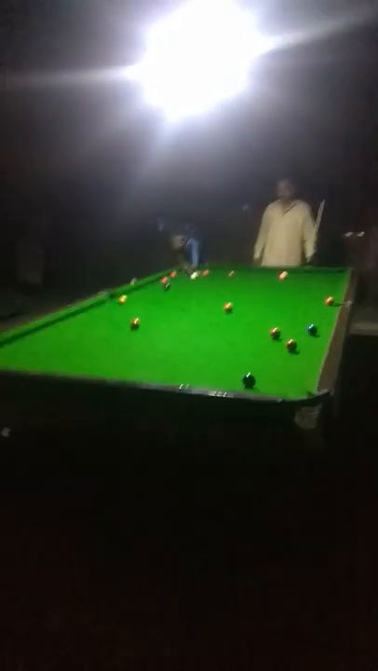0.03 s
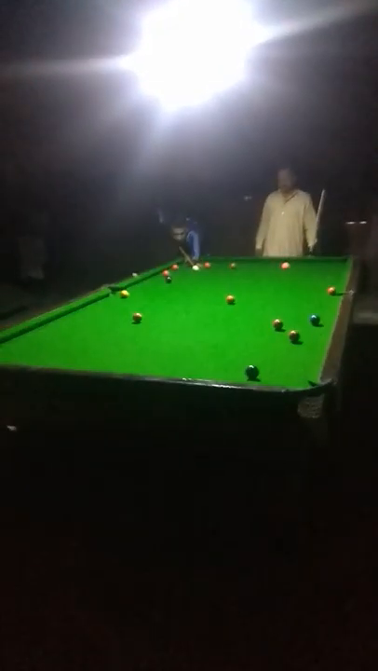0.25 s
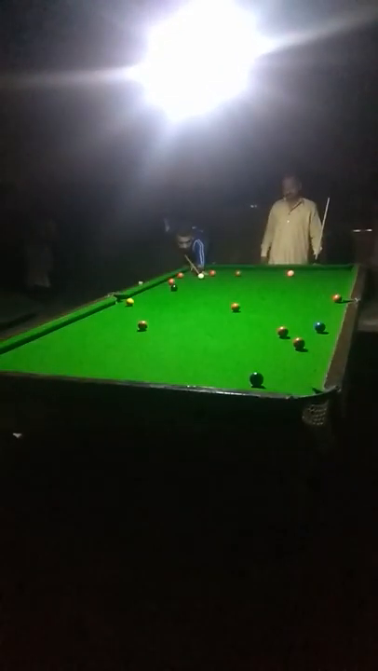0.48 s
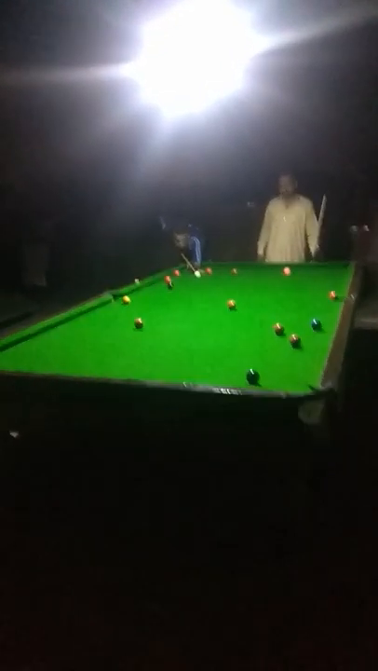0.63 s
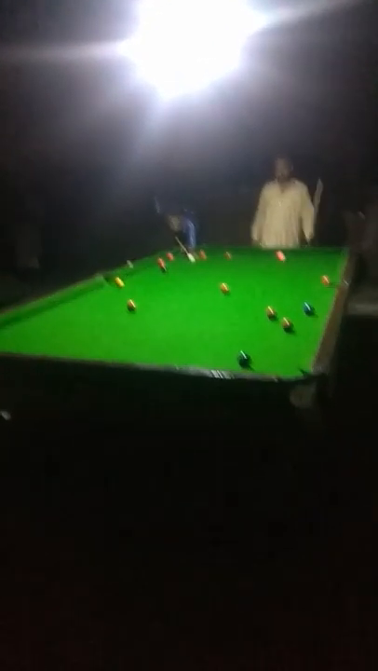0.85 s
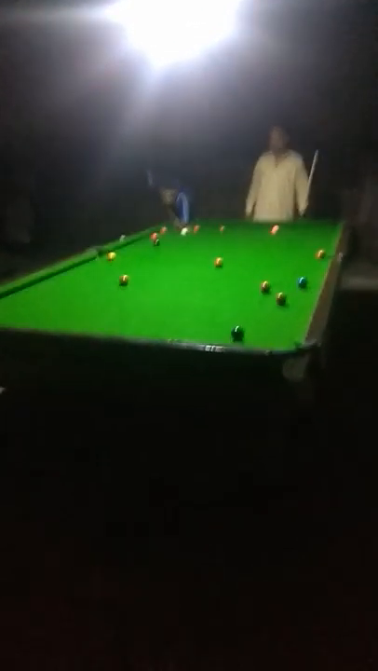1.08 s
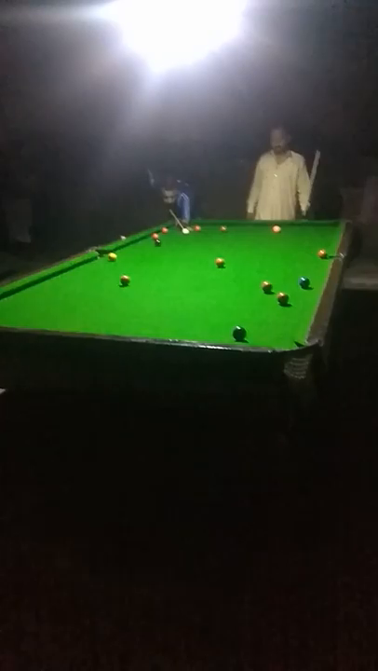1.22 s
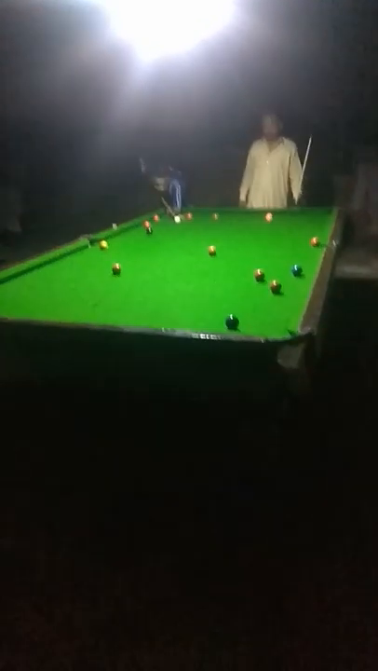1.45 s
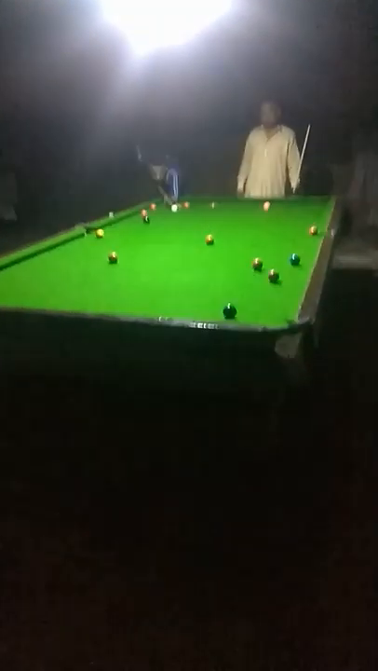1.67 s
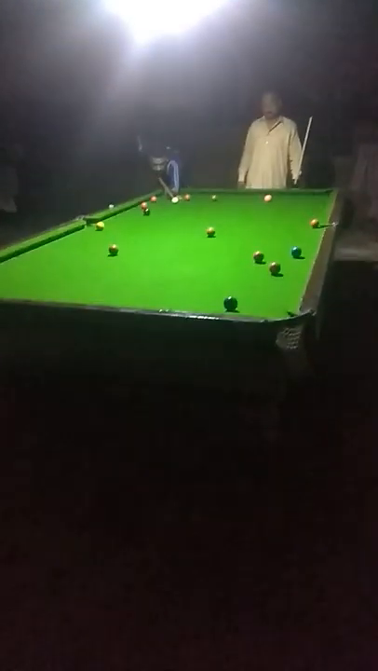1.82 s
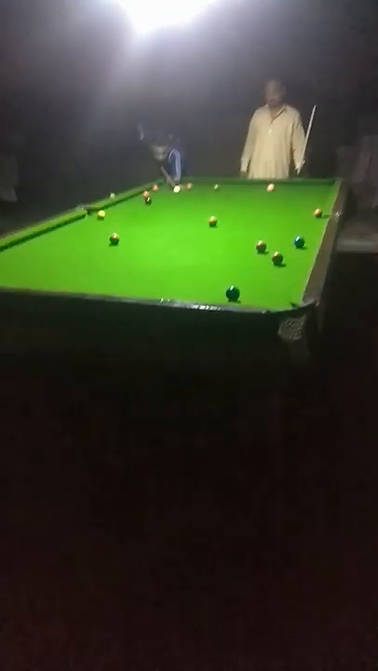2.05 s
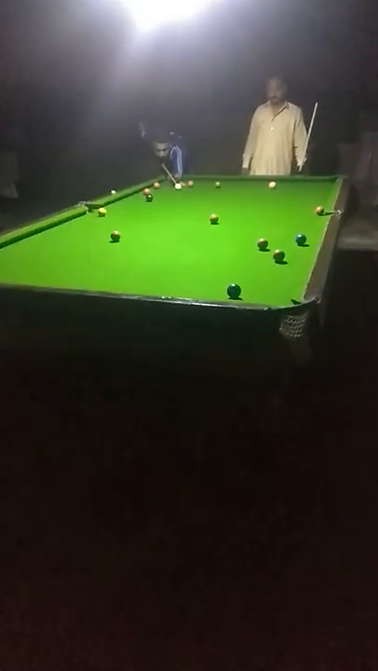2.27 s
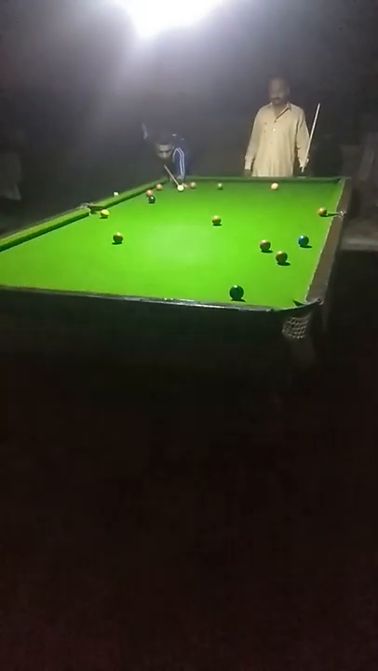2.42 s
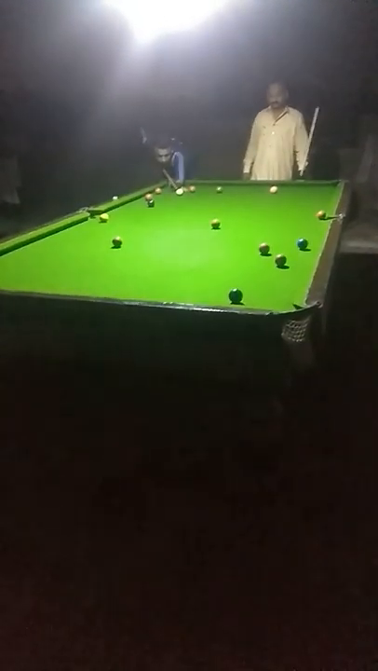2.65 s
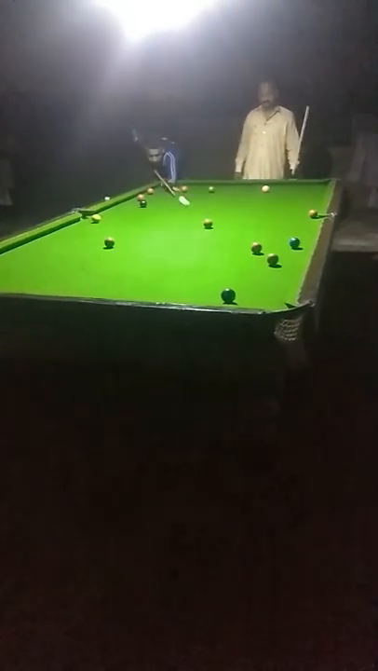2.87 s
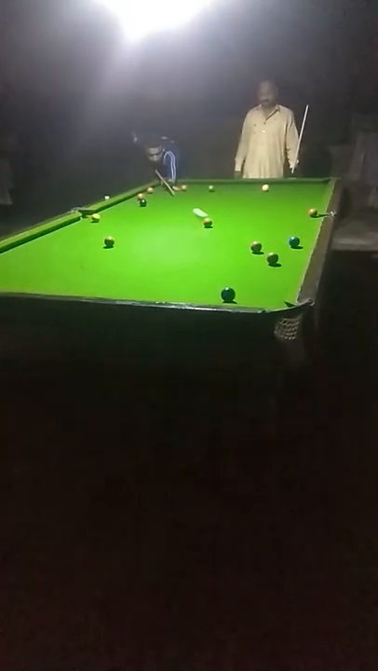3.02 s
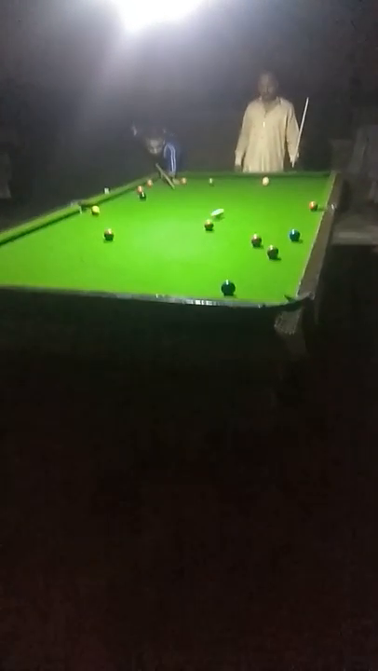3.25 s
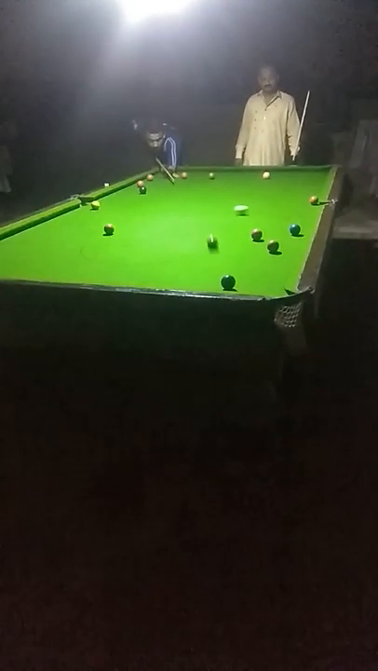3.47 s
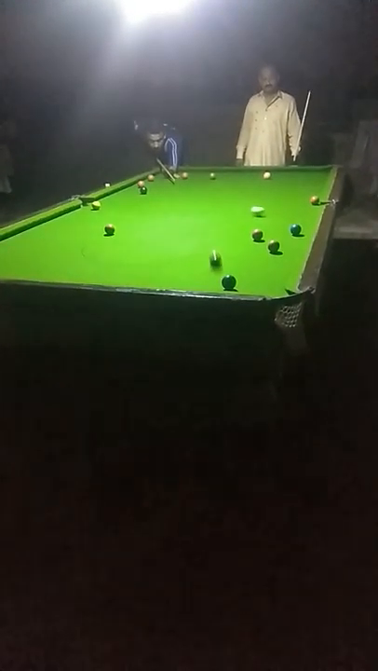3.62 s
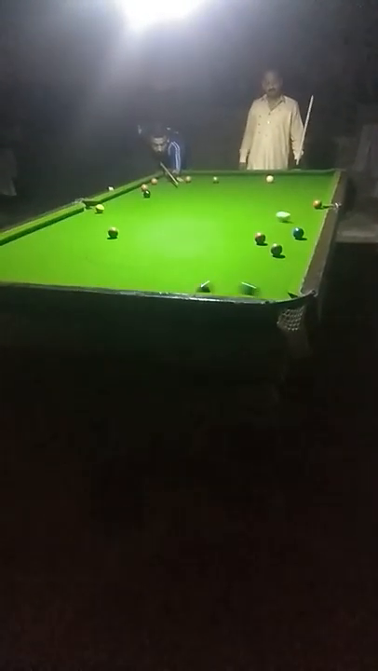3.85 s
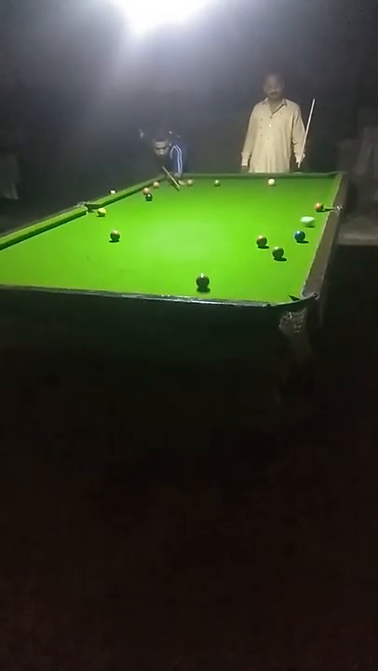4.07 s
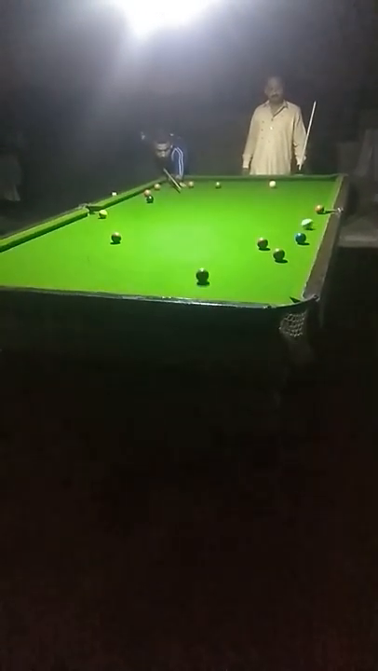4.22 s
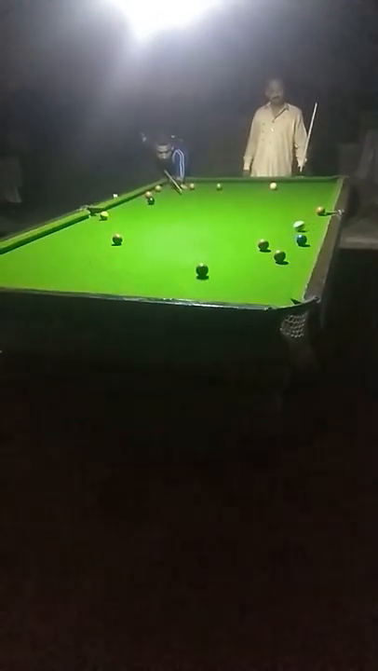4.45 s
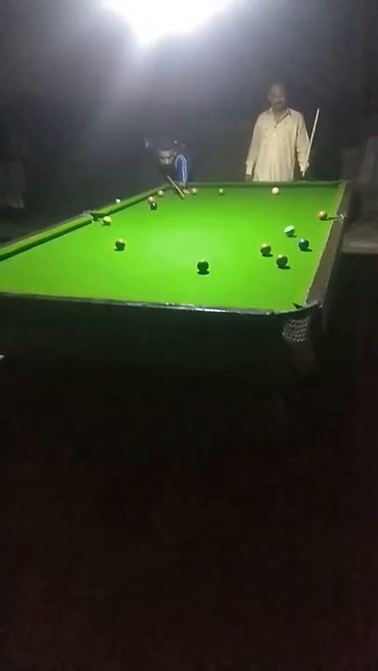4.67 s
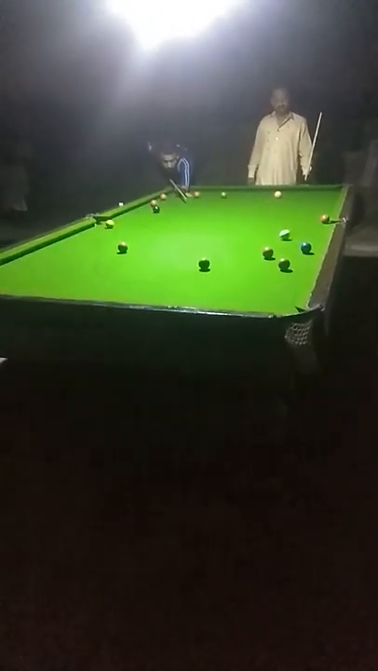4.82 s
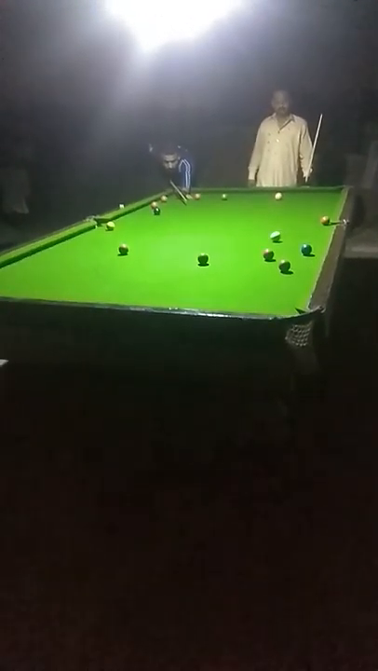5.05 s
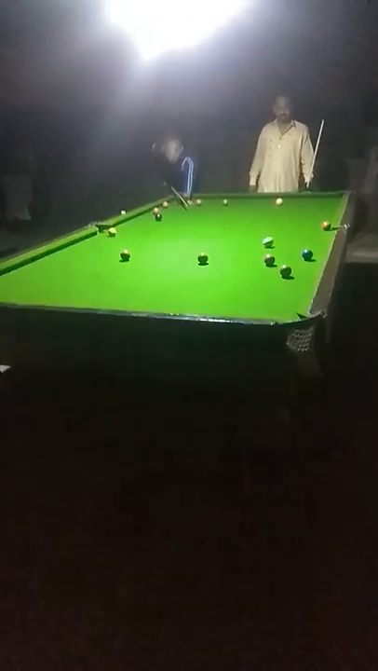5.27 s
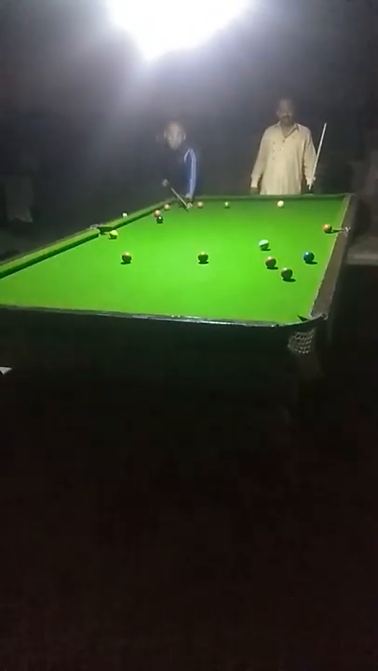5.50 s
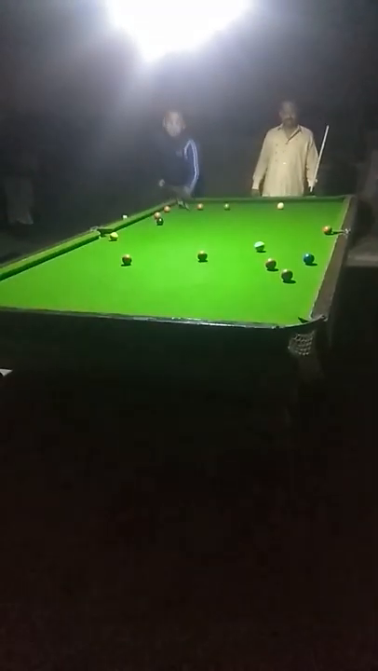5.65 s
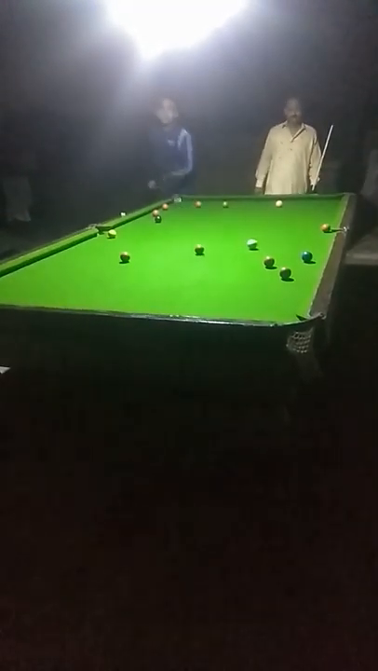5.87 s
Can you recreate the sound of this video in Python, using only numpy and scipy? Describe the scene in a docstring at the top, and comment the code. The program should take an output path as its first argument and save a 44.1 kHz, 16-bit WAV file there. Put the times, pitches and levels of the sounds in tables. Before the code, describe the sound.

Snooker under a hard roof, heard by a hand-held phone some way from the table. Near-silence with a brief shoe scrape, then a duller cue strike and sharp ball collisions, the first loudest, with snappy echoes and a short diffuse tail. A gritty foot drag crackles close on the left between later clacks; a cushion-like thump and faint cloth rustle end it.

```python
"""Snooker table at night

Under a hard roof, on a hand-held phone with two microphone ports: a cue strikes and balls clack four times, as
short pushes of air with sharp echoes and noise tails. Thuds and hollow knocks are clusters of decaying modes.
Close by on the left a shoe scuffs and clothes rustle, as strokes of shaped noise with snaps of grit.
Behind lie faint thin tones of wandering phase and a low distant rumble of noise with two hollow bands that swell
as balls roll."""
import sys
import numpy as np
from scipy import signal
from scipy.fft import rfft, irfft, next_fast_len
from scipy.io import wavfile
from scipy.ndimage import uniform_filter1d, map_coordinates

SR = 44100
rng = np.random.default_rng(int(sys.argv[2]) if len(sys.argv) > 2 else 0)


def bounce(signal):
    """Save signal as a 16-bit WAV file at the path given by the first command-line argument."""
    frames = np.transpose(np.atleast_2d(signal))
    limited = np.clip(frames, -1, 1)
    pcm = np.round(limited * 32767).astype(np.int16)
    wavfile.write(sys.argv[1], SR, pcm)


N = 260631  # samples

# Levels are those ahead of the microphones; a left-right value above 0 dB leans to the left.
# Ball on ball. Each row: peak time in seconds, level in dB, left-right in dB, pitch in Hz, lag of the left in ms,
# crack of first touch in dB, tail in dB, treble tail in dB, stretch of the tail's decay (ratio),
# tilt of the tail in dB per octave.
CLACKS = [(3.19, -3, 2, 2970, 0.0961, -19, -20.5, -47, 1, 0.5),
          (3.8313, -7, 1.8, 3260, .07, -33.5, -29.5, -53, 0.89, -2.5),
          (3.8656, -16, 1.5, 2880, 0, -53, -35.5, -58.5, 0.78, 3.5),
          (4.7039, -5.5, 4.5, 3030, 0, -23, -30.5, -42.5, 0.98, -1.5)]
# Sharp echoes, one list per clack in order of delay, the roof's near 6 to 8 ms. Each row: delay in ms, level in dB,
# left-right in dB, lag of the left in ms.
ECHOES = [
    [(5.8, -7.6, 0, .14), (6.5, -3.8, -2.7, -.27), (10.1, -15, -13, 0), (34, -14.2, -9.2, .11),
     (37, -17.4, -1, -.23), (56.5, -16, -4, .2)],
    [(3.2, -18.7, 4.8, -.2), (6.7, -8.2, -1.5, .14), (10.9, -19.3, -4.6, .2)],
    [(1.2, -19.8, 4.9, .05), (6.6, -18.5, .9, -.11), (12.8, -21.7, 8.1, -.2)],
    [(6, -16.1, -3.4, .07), (7.6, -20.3, -1.7, .23), (10.9, -20.2, -8.1, .02), (46.6, -21.1, 2.7, .02)],
]
# Colour of the clacks' tail, then of its treble. Each row: frequency in Hz, relative level in dB.
BALL_COLOUR = [(290, -44), (500, -23.5), (623, -16.5), (805, -10.5), (925, -4), (1730, 0.5), (2480, 1),
               (5460, -10), (8000, -35.5), (10400, -72.5), (17600, -120)]
BALL_TREBLE = [(5000, -36.5), (7500, 0.5), (10000, -3.5), (13000, 1), (16000, -10.5)]
# Decay of the yard before each clack's stretch, then of the treble tail. Each row: frequency in Hz, t60 in seconds.
YARD_DECAY = [(600, 0.31), (1200, 0.31), (2500, 0.44), (4000, 0.39), (6000, 0.24), (12000, 0.16)]
TREBLE_DECAY = [(6000, 0.27), (9000, 0.2517), (13000, 0.27), (16000, .25)]
# Cue tip on the ball. Each row: start in seconds, level in dB, left-right in dB, pitch in Hz,
# lag of the left in ms, tail in dB.
CUE_STRIKES = [(2.8355, -21, 1.5, 1058, 0.18, -28.5)]
# Rattle of shaft, rest and slate. Each row: frequency in Hz, relative level in dB.
CUE_COLOUR = [(59, -46.5), (100, -26.5), (181, -6.5), (513, -7.5), (662, -9.5), (752, -8.5), (4470, -21.5),
              (5420, -17), (7610, -30.5), (10700, -25.5), (16000, -38)]
# Decay of that rattle. Each row: frequency in Hz, t60 in seconds.
CUE_DECAY = [(150, 0.66), (400, 0.42), (1000, .35), (3000, 0.37), (8000, 0.24), (15000, 0.3)]
# Ringing of the cue's shaft and steel rest. Each row: frequency in Hz, level in dB, t60 in seconds.
CUE_RING = [(581, -42, .43), (764, -44, .3), (2283, -48, .2), (2725, -43, .4), (2760, -48, .55),
            (5308, -54, .28)]
# Soft thuds of cushions, table frame and feet. Each row: time in seconds, relative level in dB, left-right in dB,
# centre pitch in Hz, t60 in seconds, spread to either side in octaves.
THUDS = [(.159, -53.5, -16, 477.6, 0.27, 0.29), (.292, -43.5, -2, 193, 0.083, 0.34),
         (.722, -51.5, -13, 477, 0.16, 0.33), (1.289, -49.5, -8, 460, 0.061, 0.29),
         (1.76, -41.5, -11.5, 317.5, 0.17, 0.62), (1.849, -49, -0.5, 169, 0.2, 0.19),
         (1.969, -49.5, 0, 160, 0.52, 0.29), (2.125, -48.5, -4, 209, .24, 0.3),
         (2.735, -44.5, -1, 179, 0.088, 0.28), (2.863, -32.5, -1, 212, .12, 0.19),
         (2.935, -29.5, -1, 205.4, .3, .2), (3.0, -37, 0, 199.5, 0.21, 0.22),
         (3.058, -41, 0, 214.4, 0.33, 0.19), (3.099, -36.5, -1, 201, .1, 0.3),
         (3.208, -31.5, -4.5, 329.7, 0.22, 0.62), (3.246, -26.5, -3, 334.5, 0.15, .6),
         (3.291, -33.5, -7.5, 277.5, .16, 0.492), (4.471, -45.5, -4.5, 153, 0.38, 0.43),
         (4.988, -45, -10, 267.3, 0.14, .3), (5.152, -47.5, 3, 195.5, 0.19, 0.51),
         (5.343, -29.5, -3.5, 349, 0.22, 0.32), (5.448, -45, -7.5, 434, .2, 0.34),
         (5.678, -48.5, 2, 160, .21, 0.42)]
# Small hollow knocks of rolling balls. Each row: time in seconds, relative level in dB, left-right in dB,
# centre pitch in Hz, t60 in seconds.
KNOCKS = [(.924, -53.5, 3, 850, 0.15), (1.455, -53.5, 1.5, 818, 0.12), (3.808, -53.5, 5, 895, 0.11),
          (4.109, -56.5, 14, 894, 0.092), (4.325, -32, 3, 868, 0.23), (4.346, -33.5, 7, 871, .2),
          (4.419, -39.5, 1, 850.5, 0.38), (4.716, -32.5, 1, 893, 0.2), (4.809, -41, 3.5, 902, .14),
          (5.315, -56, 21, 868, .13), (5.877, -55.5, 6, 846, .11)]
# Grit under a sole and rubbing cloth, one list of strokes per passage. Each row: time of the peak in seconds,
# relative level in dB, 60 dB rise in seconds, hold in seconds, t60 in seconds, left-right in dB.
RUSTLES = [
    [(.001, -78, .1, .04, .3, 24), (.08, -57, .015, .012, .1, 13), (.1, -41, .045, .028, .3, 8),
     (.2, -66, .2, .03, .42, 14)],
    [(.818, -82, .05, .02, .4, 22), (.96, -85, .1, .01, .3, 19), (1.01, -85, .1, .01, .2, 19),
     (1.052, -77, .02, .004, .1, 3)],
    [(3.26, -61, .1, .015, .2, 4), (3.364, -70, .2, .02, .4, 16), (3.456, -71.5, .15, .01, .16, 10)],
    [(4.21, -65, .09, .015, .16, 20)],
    [(4.304, -51, .03, .005, .2, 10), (4.38, -30, .025, .002, .06, 9.5), (4.385, -45, .03, .01, .3, 10)],
    [(5.272, -76, .04, .005, .17, 18)],
    [(5.455, -77, .05, .015, .2, 15), (5.48, -72, .05, .035, .25, 14), (5.6, -75, .06, .05, .22, 14),
     (5.722, -68, .04, .035, .24, 12), (5.86, -79, .04, .015, .25, 13)],
]
# Colour of each passage. Each row: frequency in Hz, relative level in dB.
RUSTLE_COLOURS = [
    [(2940, -24.5), (5000, -11.5), (8670, -0.5), (12000, 2.5), (15200, -6.5), (16000, -16.5)],
    [(2940, -17), (5000, -17), (5280, -14), (5750, -24), (6490, 3.5), (12000, -13), (15600, -44),
     (22000, -120)],
    [(5000, -60.5), (8500, -30), (10600, -5), (14400, -4), (16000, 0)],
    [(5000, -61), (8500, -33), (12000, -2), (14400, -0.5), (16000, -13)],
    [(2940, -31.5), (5000, 0), (6790, -6), (7820, -0.5), (10100, -5), (12400, 4.5), (16000, -15.5)],
    [(5290, -50), (9000, -14.5), (12600, 11), (15400, -25), (16000, -36)],
    [(2650, -49), (4500, -28), (5140, -45), (5530, -21.5), (10200, -2.5), (14900, -9.5), (16000, -14.5)],
]
# Single snaps of grit. Each row: start in seconds, relative level in dB, left-right in dB.
SNAPS = [(0.0874, -36.5, 8), (0.0986, -23, 8), (4.3023, -40, 25), (4.3147, -45.5, 4.5), (4.329, -39.5, 3.5),
         (4.377, -25.5, 11.5), (4.3783, -16.5, 12.5), (4.3922, -29.5, 4.5), (4.4245, -36, 11.5),
         (4.4549, -35.5, 8), (5.7335, -43.5, 9), (5.7514, -56.5, 11.5)]
# Body, then bright edge, of the two shoe drags, as strokes. Each row: time of the peak in seconds, level in dB,
# 60 dB rise in seconds, hold in seconds, t60 in seconds, left-right in dB.
DRAG_BODIES = [
    [(0.122, -44, 0.09, 0.0063, 0.26, 2.5)],
    [(4.32, -41, .07, 0.11, 0.81, 0.5)],
]
DRAG_EDGES = [
    [(.1, -45, .06, 0.011, 0.36, 1.8)],
    [(4.306, -49.5, .03, .02, 0.18, .5), (4.377, -40, .02, .004, .3, 1)],
]
# Colours of the bodies, then of the edges. Each row: frequency in Hz, relative level in dB.
BODY_COLOURS = [
    [(530, -65.5), (900, -25), (1270, -1.5), (1430, -29), (1620, -1), (1760, -3), (2570, 1), (2900, -14.5),
     (3770, -40), (6380, -120)],
    [(350, -52), (600, -23), (712, -18), (851, 1), (1110, -9), (1400, -0.5), (2260, -6), (2700, -14.5),
     (2900, -10), (3770, -39), (6380, -120)],
]
EDGE_COLOURS = [
    [(1710, -38), (2900, -9), (3420, -0.5), (3710, -4), (5660, -4.5), (6500, -3.5), (8450, -37.5),
     (14300, -120)],
    [(1650, -28.5), (2800, 1.5), (3830, -4), (4210, 0.5), (4720, -9.5), (6500, -8), (8450, -36),
     (14300, -120)],
]
# Something hollow and metallic hums on after the second drag. Each row: frequency in Hz, relative level in dB.
AFTER_RING = [(1200, -29.5), (1450, -8), (1700, -14.5), (2050, 0.5), (2500, -17.5), (3200, -0.5),
              (3700, -16.5), (4200, -14), (5200, -42.5)]
# Decay of that hum. Each row: frequency in Hz, t60 in seconds.
AFTER_DECAY = [(1450, .9), (2050, 1.6), (3200, 1.31), (4200, 0.87)]
# Faint thin tones. Each row: start in seconds, length in seconds, pitch in Hz, level in dB.
THIN_TONES = [(.22, .2, 2230, -75), (.46, .54, 6250, -88), (.83, .3, 2200, -81), (1.26, .2, 2200, -81),
              (1.045, .025, 4500, -77), (1.045, .025, 5450, -80), (1.47, .15, 2010, -79),
              (2.34, .09, 1900, -80), (2.54, .09, 1950, -78), (2.52, .17, 2900, -85),
              (5.18, .08, 4200, -82)]
# Colours of the distant rumble, the upper and the lower hollow band. Each row: frequency in Hz, relative level in dB.
NIGHT_COLOUR = [(15, -55.5), (25, -26), (80, -37), (99, -1), (157, 1.5), (309, -4.5), (354, -4),
                (476, -7.5), (560, -11), (840, -12.5), (1160, -15.5), (2000, -24.5), (4250, -41.5),
                (11000, -41.5), (16000, -55.5)]
UPPER_BAND = [(700, -38), (800, 3.5), (860, 9.5), (930, -5.5), (1050, -49.5)]
LOWER_BAND = [(390, -37.5), (450, -4.5), (485, 1.5), (520, -5), (590, -47)]
# Left-right likeness of the rumble. Each row: frequency in Hz, likeness (1 is mono; below 0 counts as 0).
NIGHT_ALIKE = [(60, 0.59), (180, 1), (550, 0.51), (1650, 0.15), (4970, -0.86), (15000, -0.04)]
# Swells of the upper band while balls roll, then of the lower. Each row: time in seconds, relative level in dB.
UPPER_SWELLS = [(0, -78.5), (.52, -69.5), (.8, -80), (3.5, -80), (3.95, -57.5), (4.4, -66), (5.1, -63.5),
                (5.45, -74), (5.73, -67.5), (5.91, -76.5)]
LOWER_SWELLS = [(0, -62), (.5, -73.5), (.8, -68.5), (1.1, -80.5), (4.1, -81.5), (4.36, -70), (5.25, -83.5),
                (5.51, -61.5), (5.91, -77.5)]

ECHO_PITCH, TOUCH_LEAD_S = .98, .0006  # echo's pitch over the clack's; first touch before the peak
# Weak echoes off balls and cushions: span, greatest level against the clack, mean pitch over the clack's
SCATTER_S, SCATTER_DB, SCATTER_PITCH = .014, -15, .87
KNOCK_SPREAD_OCT = .09
SNAP_T60_S, SPIKE_DB, SPIKE_T60_S = .012, 9, .0025  # a grain's fizz, and the spike over it at the start
NIGHT_DB = -64.5
TOP_HZ = 16100  # top of the sound's band


def balls():
    """Hard balls clack; roof, walls, cushions and other balls return echoes, and the yard a diffuse tail."""
    out = np.zeros((2, N))
    t = np.arange(400) / SR
    for clack, echoes in zip(CLACKS, ECHOES):
        s, db, pan_db, hz, lag_ms, crack_db, tail_db, treble_db, stretch, tilt_db = clack
        arrivals = [(s, db, pan_db, hz, lag_ms)]
        for delay_ms, echo_db, echo_pan, echo_lag in echoes:
            arrivals.append((s + delay_ms / 1000, echo_db, echo_pan, ECHO_PITCH * hz, echo_lag))
        for u, a, b, c, d in rng.random(size=(7, 5)):
            weak_hz = SCATTER_PITCH * hz * (.9 + .2 * c)
            weak_s = s + .001 + SCATTER_S * u ** 2  # crowded towards the clack
            arrivals.append((weak_s, db + SCATTER_DB - 3 * a, 10 * b - 5, weak_hz, .45 * d - .25))
        for at, *shape in arrivals:
            add(out, at - .001, click(*shape, turns=.7))  # a click peaks 1 ms in

        touch = s - TOUCH_LEAD_S
        hiss = np.diff(uniform_filter1d(rng.standard_normal((2, len(t) + 1)), size=4))
        add(out, touch, amp(crack_db - 60 * t / 0.012) * hiss)
        colour = [(f, level + tilt_db * np.log2(f / 2500)) for f, level in BALL_COLOUR]
        decay = np.multiply(YARD_DECAY, [1, stretch])
        add(out, touch, amp(tail_db) * tail(colour, decay, rise=.016))
        add(out, touch, amp(treble_db) * tail(BALL_TREBLE, TREBLE_DECAY, rise=.0012))
    return out


def cue():
    """The leather tip gives a duller push; shaft and table go on rattling."""
    out = np.zeros((2, N))
    t = np.arange(SR // 2) / SR
    for s, db, pan_db, hz, lag_ms, tail_db in CUE_STRIKES:
        add(out, s, click(db, pan_db, hz, lag_ms, turns=0.82))
        add(out, s + 0.00044, amp(tail_db) * tail(CUE_COLOUR, CUE_DECAY, rise=.003))
        for ring_hz, ring_db, t60 in CUE_RING:
            drift = np.cumsum(rng.normal(0, .018, (2, len(t))), axis=1)  # the phase wanders: no glassy tone
            envelope = amp(ring_db - 60 * t / t60) * (1 - np.exp(-t / 0.0027))
            add(out, s + 0.0016, envelope * np.sin(2 * np.pi * ring_hz * t + drift))
    return out


def thuds():
    """Cushions, table frame and feet take soft blows, each ringing a cluster of modes."""
    return soft_blows(THUDS, attack=0.0036, overtone_db=-12.5, lag_ms=.15)


def knocks():
    """Rolling balls knock, hollow and small: the same ringing in a narrow band."""
    table = [row + (KNOCK_SPREAD_OCT,) for row in KNOCKS]
    return soft_blows(table, attack=.0029, overtone_db=-25.0, lag_ms=.08)


def rustles():
    """Grit and cloth rub in the treble, with snaps of grit; the phone's body shades the right port."""
    treble = snaps()
    for strokes, colour in zip(RUSTLES, RUSTLE_COLOURS):
        treble += played(strokes, colour, alike=0.32, patchy_db=3.5, grit_db=2)
    treble[1] = 2 * signal.lfilter(*signal.butter(2, 7500, fs=SR), treble[1])
    return treble


def snaps():
    """A grain gives way: a sharp spike of bright noise, then a short fizz."""
    out = np.zeros((2, N))
    t = np.arange(SR // 10) / SR
    colour = [(2000, -50), (5500, -15.5), (9000, 4.0), (13000, 0), (16000, -11)]  # (Hz, relative dB)
    for s, db, pan_db in SNAPS:
        grain = noise(len(t), colour, [(1000, 0.94)], patchy_db=-0.5)
        fizz = amp(db - 16 - 60 * t / SNAP_T60_S)
        spike = amp(db - 16 + SPIKE_DB - 60 * t / SPIKE_T60_S)
        onset = 1 - np.exp(-t / .0002)
        add(out, s, grain * (fizz + spike) * onset * sides(pan_db)[:, None])
    return out


def drags():
    """The sole scrapes in the middle range, with bright edges; a metallic hum follows the second drag."""
    out = np.zeros((2, N))
    for strokes, colour in zip(DRAG_BODIES + DRAG_EDGES, BODY_COLOURS + EDGE_COLOURS):
        out += played(strokes, colour, alike=.2, patchy_db=2, grit_db=3)
    add(out, 4.38, amp(-45.5) * tail(AFTER_RING, AFTER_DECAY, rise=0.042))
    return out


def thin_tones():
    """Faint thin tones, wandering in phase, fade in and out."""
    out = np.zeros((2, N))
    for s, length, hz, db in THIN_TONES:
        t = np.arange(0, length, 1 / SR)
        drift = np.cumsum(rng.normal(0, 0.054, (2, len(t))), axis=1)
        fade = np.sin(np.pi * t / length) ** .5
        add(out, s, amp(db) * fade * np.sin(2 * np.pi * hz * t + drift))
    return out


def night():
    """Distant low rumble with two wavering hollow bands in it, all of shaped noise."""
    t = np.arange(N) / SR
    far = noise(N, NIGHT_COLOUR, NIGHT_ALIKE, patchy_db=3.0) * amp(NIGHT_DB)
    upper = noise(N, UPPER_BAND, [(800, 0.26)], patchy_db=5)
    upper *= amp(np.interp(t, *np.transpose(UPPER_SWELLS)) + 1.7 * wobble(N, rate=4.5))
    lower = noise(N, LOWER_BAND, [(500, .31)], patchy_db=2.5)
    lower *= amp(np.interp(t, *np.transpose(LOWER_SWELLS)) + 2.5 * wobble(N, rate=5))
    return far + upper + lower * amp(-2.5) * sides(-8.0)[:, None]


def click(db, pan_db, hz, lag_ms, turns):
    """A hard contact pushes the air for under two cycles: out, in, out."""
    ear_delay = np.array([[.5], [-.5]]) * lag_ms / 1000
    t = np.arange(-.001 * SR, .003 * SR) / SR - ear_delay
    cycles = t * hz
    width = np.where(cycles < 0, turns, 1.1 * turns)
    push = np.cos(2 * np.pi * cycles - .3) * np.exp(-(cycles / width) ** 2)
    return -amp(db) * sides(pan_db)[:, None] * push


def soft_blows(table, attack, overtone_db, lag_ms):
    """Each soft blow rings a cluster of close modes, at other strengths in each ear."""
    out = np.zeros((2, N))
    t = np.maximum(np.arange(SR // 2) / SR - np.array([[lag_ms], [0]]) / 1000, 0)  # the left lags
    spread = np.array([-1, -.62, 0, .33, .9])[:, None, None]
    all_luck = rng.standard_normal((len(table), 5, 3, 1))  # per mode: pitch, left and right strength
    for (s, db, pan_db, hz, t60, width), luck in zip(table, all_luck):
        strength = amp(-8 * np.abs(spread) + 2.5 * luck[:, 1:])
        mode_hz = hz * 2 ** (width * (spread + 0.057 * luck[:, :1]))
        modes = strength * np.sin(2 * np.pi * mode_hz * t)
        overtone = amp(overtone_db) * np.sin(2 * np.pi * 1.95 * hz * t)
        envelope = amp(db - 6.5 - 60 * t / t60) * (1 - np.exp(-t / attack))
        add(out, s + .002, sides(pan_db)[:, None] * (modes.sum(axis=0) + overtone) * envelope)
    return out


def played(strokes, spectrum, alike, patchy_db, grit_db):
    """Friction noise in strokes that rise, hold and die; grit makes it lumpy from one millisecond to the next."""
    first = max(round((strokes[0][0] - .25) * SR), 0)
    t = np.arange(first, min(first + round(1.2 * SR), N)) / SR
    level = 0
    for s, db, rise, hold, t60, pan_db in strokes:
        before = np.clip(s - t, 0, None)
        after = np.clip(t - s - hold, 0, None)
        level = level + sides(pan_db)[:, None] * amp(db - 60 * before / rise - 60 * after / t60)
    rub = noise(len(t), spectrum, [(1000, alike)], patchy_db)
    sound = unit(rub * amp(grit_db * wobble(len(t), rate=900)))
    return np.pad(sound * level, ((0, 0), (first, N - first - len(t))))


def tail(spectrum, decay, rise):
    """Diffuse answer fading in over a noise of rms 1: each frequency dies at its own speed."""
    source = noise(SR, spectrum, alike=[(200, 1.0), (800, 0.42), (2000, 0.018)], patchy_db=2.0)
    hz, t, z = signal.stft(source, SR, nperseg=256)
    dying = z * amp(-60 * t / along(decay, hz)[:, None])
    sound = signal.istft(dying, nperseg=256)[1][:, :SR]
    return sound * (1 - np.exp(-np.arange(SR) / SR / rise))


def noise(size, spectrum, alike, patchy_db):
    """Stereo noise of rms 1 with patches of random gain; mid and side set how alike the ears are."""
    hz, t, z = signal.stft(rng.standard_normal((2, size + 1024)), SR, nperseg=1024)
    patches = uniform_filter1d(uniform_filter1d(rng.standard_normal(z.shape[1:]), 4, 0), 4, 1)
    turn = np.arccos(np.clip(along(alike, hz), 0, 1)) / 2
    weights = amp(along(spectrum, hz)) * [np.cos(turn), np.sin(turn)]
    mid, side = z * amp(patchy_db * unit(patches)) * weights[..., None]
    stereo = signal.istft(np.array([mid + side, mid - side]), nperseg=1024)[1]
    return unit(stereo[:, 512:512 + size])


def wobble(size, rate):
    """A smooth random curve, rate knots a second."""
    knots = rng.standard_normal(int(size * rate / SR) + 4)
    return map_coordinates(knots, [np.arange(size) * rate / SR])


def amp(db):
    """Gain from dB."""
    return 10 ** (np.asarray(db) / 20)


def unit(x):
    """Scale to rms 1."""
    return x / np.sqrt(np.mean(x ** 2) + 1e-20)


def along(points, hz):
    """Read (Hz, value) points on a log axis."""
    f, v = np.transpose(points)
    return np.interp(np.log(hz + 1), np.log(f + 1), v)


def sides(pan_db):
    """Left and right gain."""
    return amp(np.multiply.outer([.5, -.5], pan_db))


def add(out, s, sound):
    """Mix a stereo sound in at s seconds."""
    part = out[:, round(s * SR):][:, :sound.shape[1]]
    part += sound[:, :part.shape[1]]


def scene():
    """Everything at the two microphone ports."""
    table = balls() + cue() + thuds() + knocks()
    return table + rustles() + drags() + thin_tones() + night()


def record(dry):
    """The small microphones lose the bass; nothing sounds above 16.1 kHz."""
    m = next_fast_len(N + SR // 2)
    hz = np.fft.rfftfreq(m, 1 / SR)
    bass_cut = (1j * hz / (60 + 1j * hz)) ** 2
    return irfft(rfft(dry, m) * bass_cut * (hz < TOP_HZ), m)[:, :N]


dry = scene()
out = record(dry)
bounce(out)
```